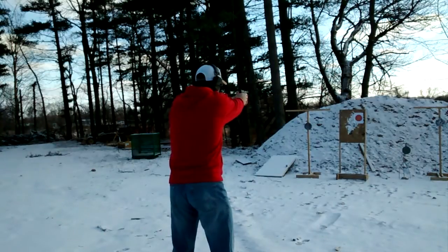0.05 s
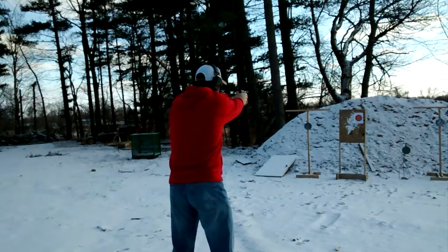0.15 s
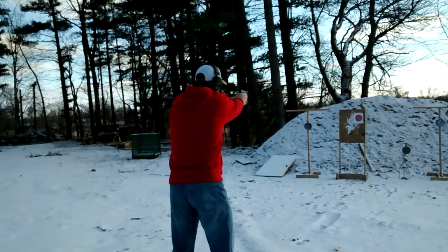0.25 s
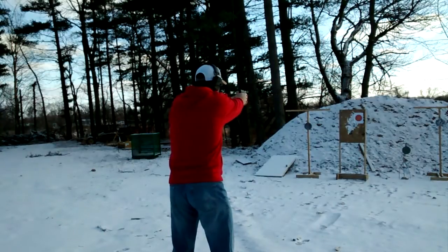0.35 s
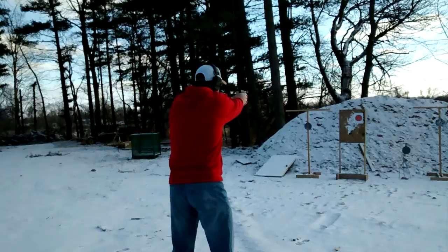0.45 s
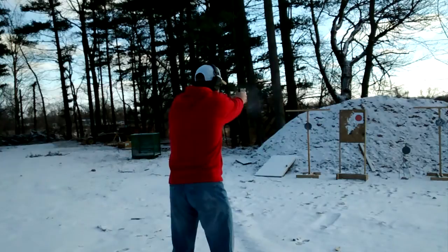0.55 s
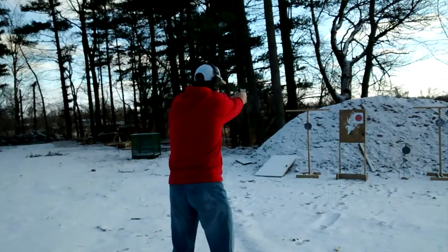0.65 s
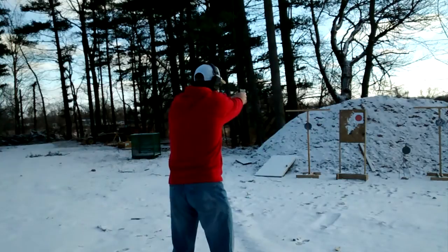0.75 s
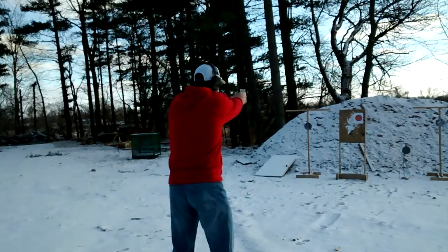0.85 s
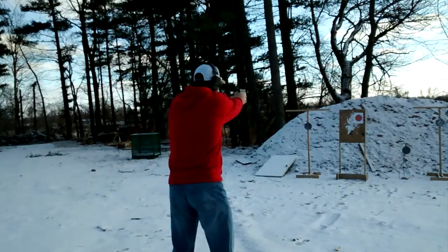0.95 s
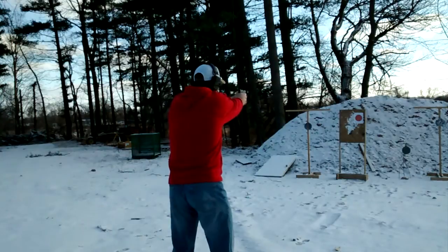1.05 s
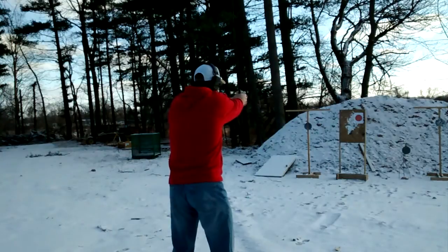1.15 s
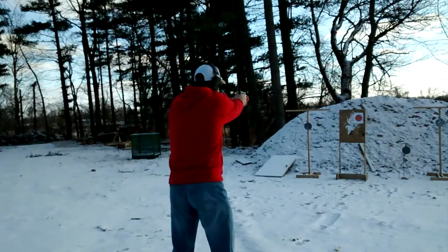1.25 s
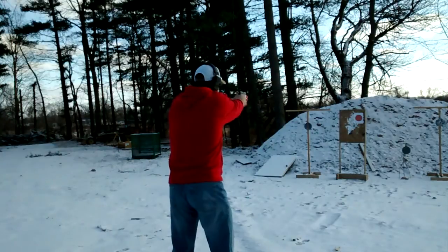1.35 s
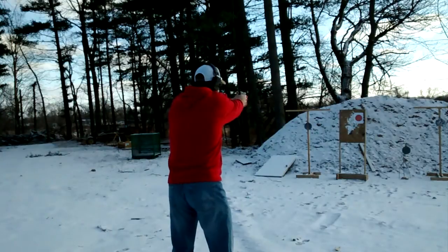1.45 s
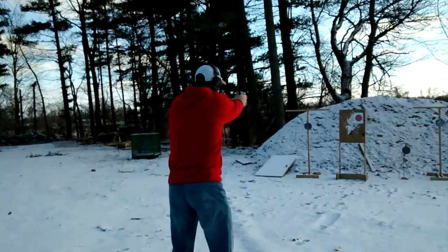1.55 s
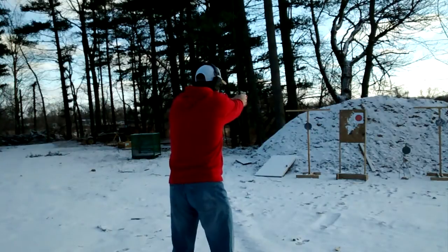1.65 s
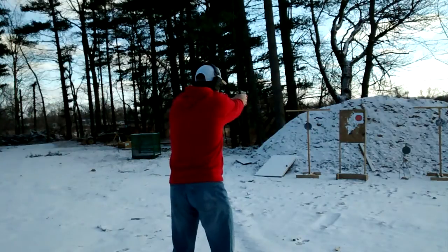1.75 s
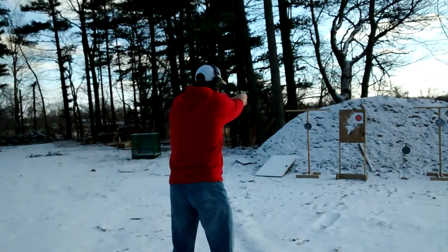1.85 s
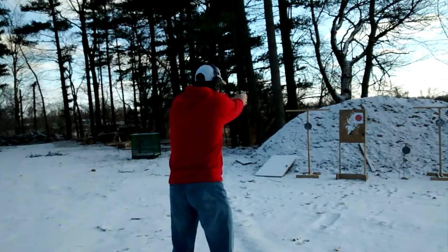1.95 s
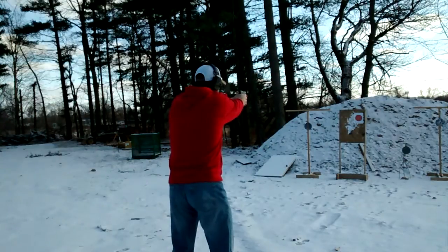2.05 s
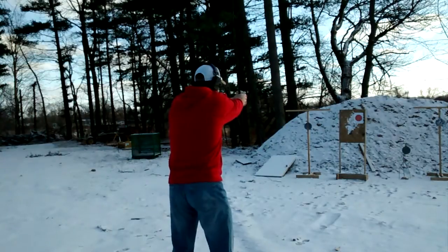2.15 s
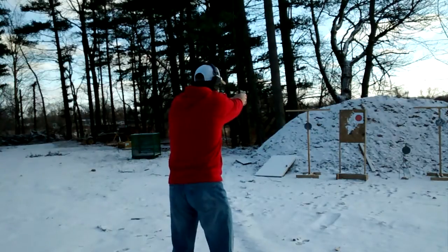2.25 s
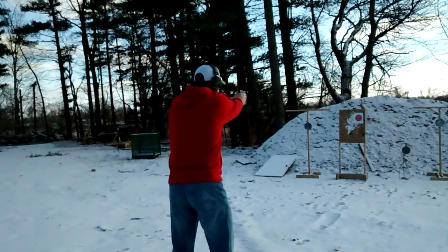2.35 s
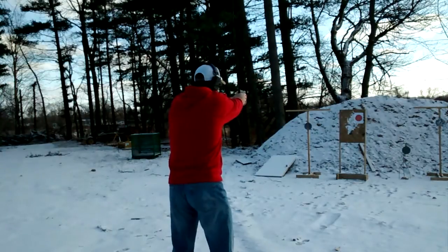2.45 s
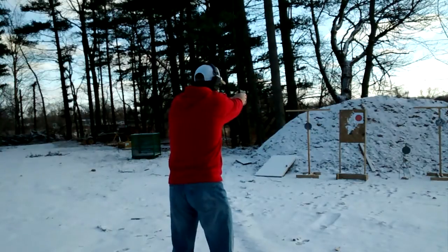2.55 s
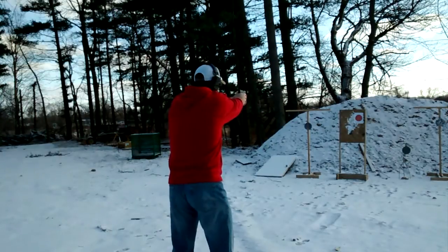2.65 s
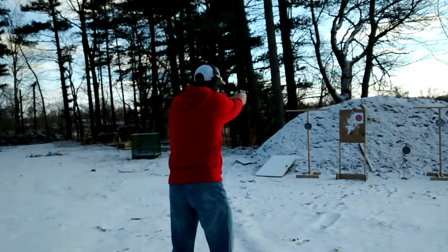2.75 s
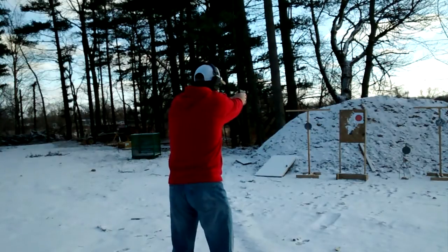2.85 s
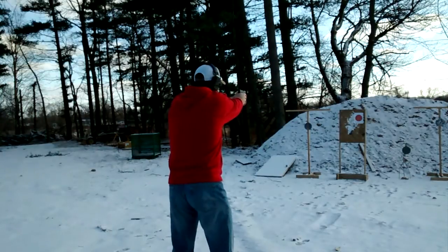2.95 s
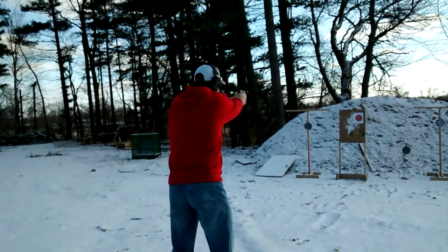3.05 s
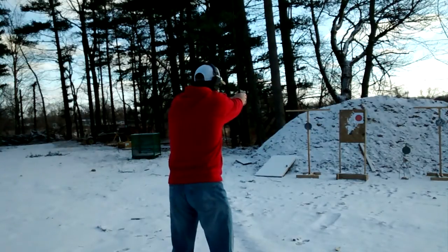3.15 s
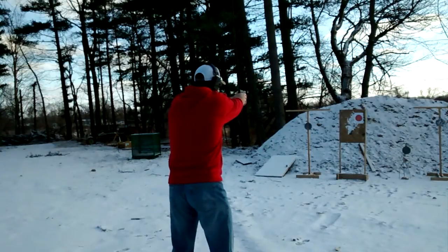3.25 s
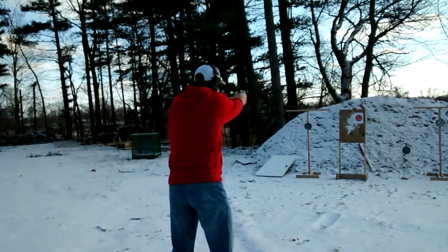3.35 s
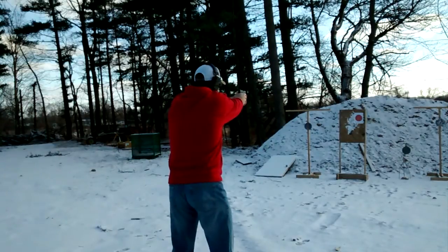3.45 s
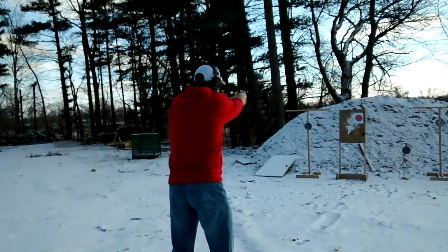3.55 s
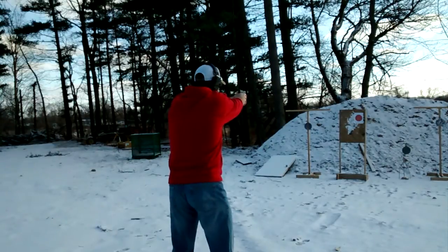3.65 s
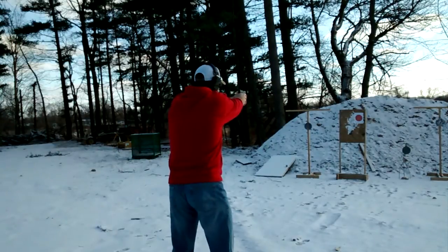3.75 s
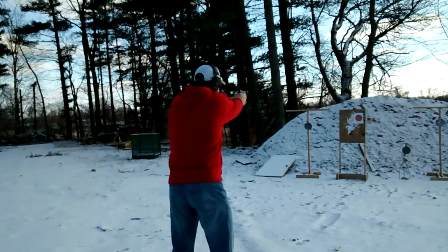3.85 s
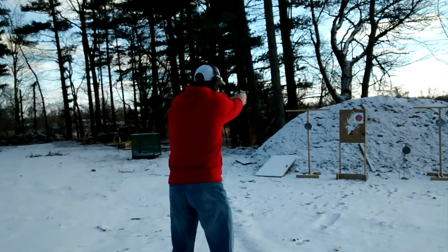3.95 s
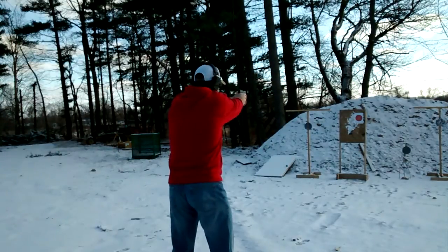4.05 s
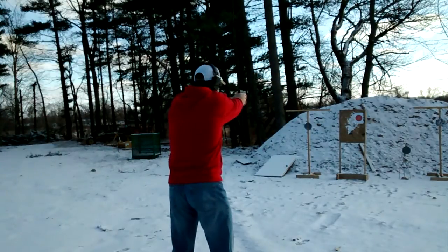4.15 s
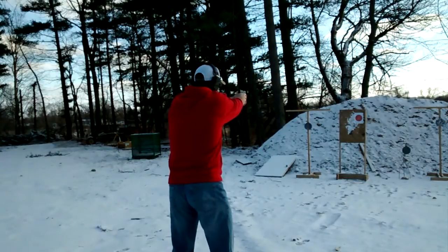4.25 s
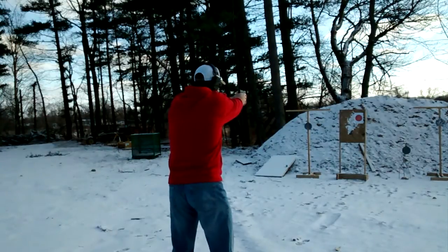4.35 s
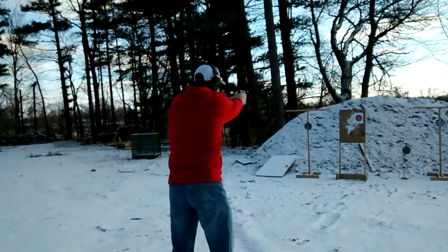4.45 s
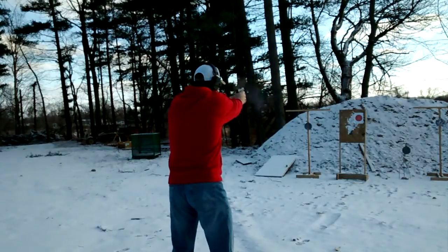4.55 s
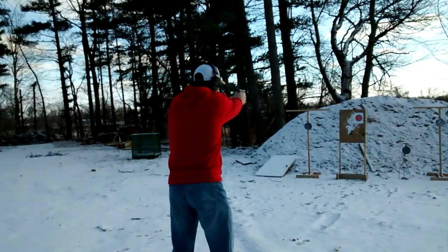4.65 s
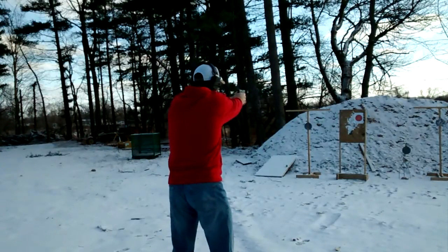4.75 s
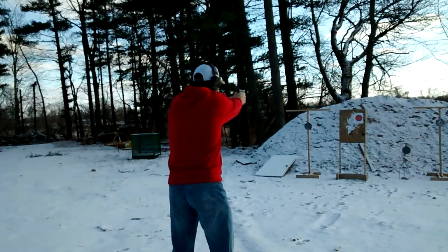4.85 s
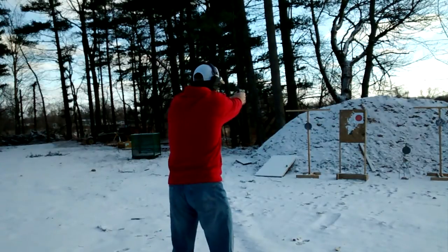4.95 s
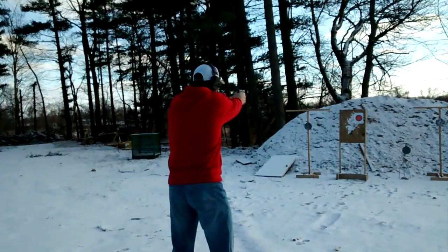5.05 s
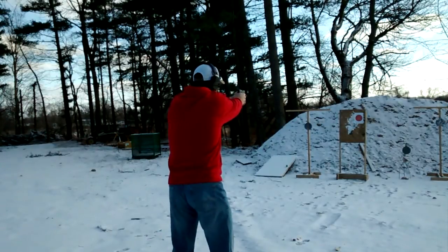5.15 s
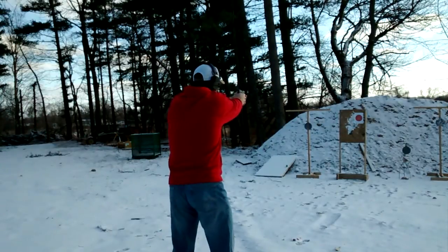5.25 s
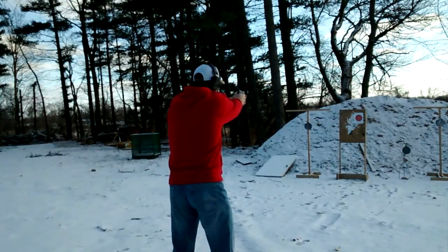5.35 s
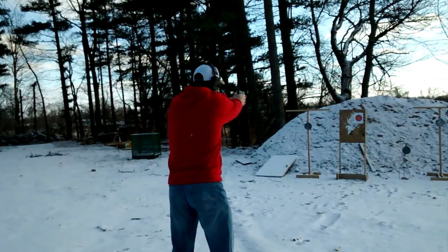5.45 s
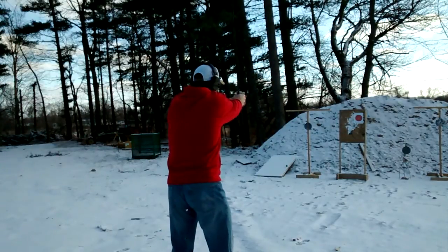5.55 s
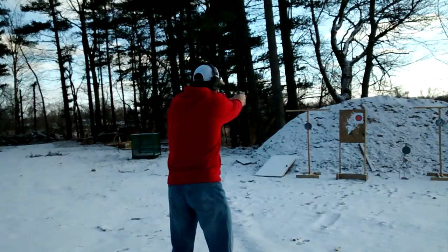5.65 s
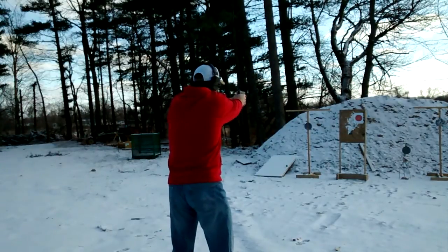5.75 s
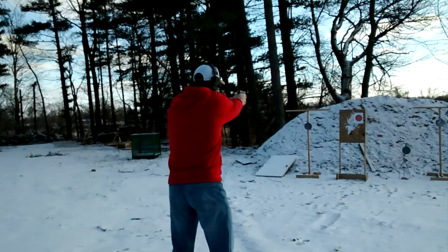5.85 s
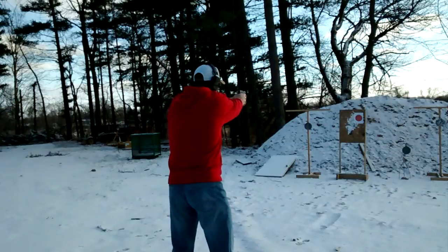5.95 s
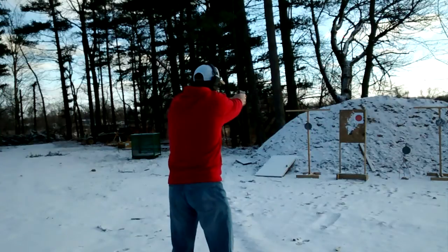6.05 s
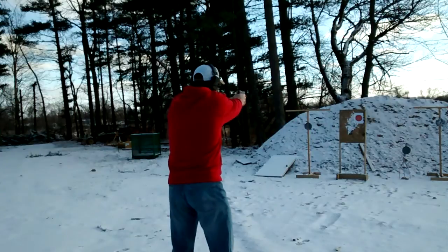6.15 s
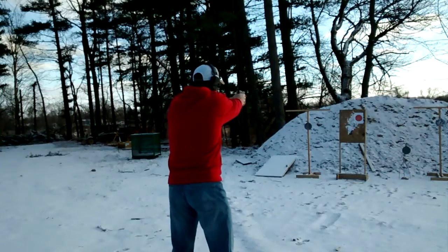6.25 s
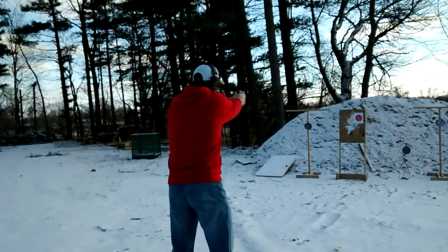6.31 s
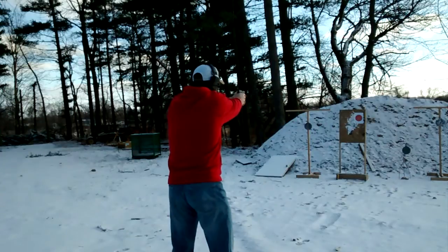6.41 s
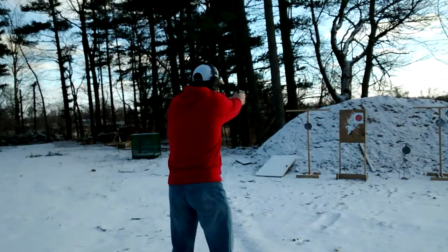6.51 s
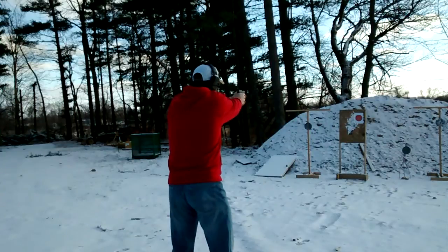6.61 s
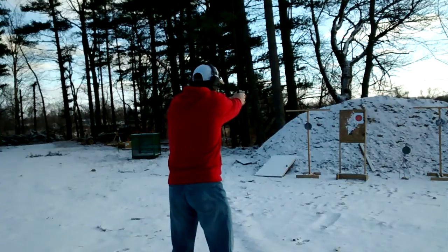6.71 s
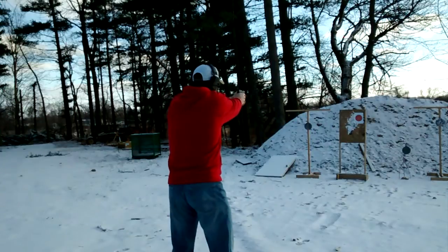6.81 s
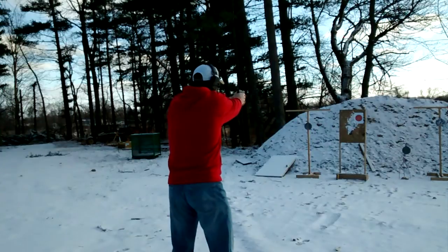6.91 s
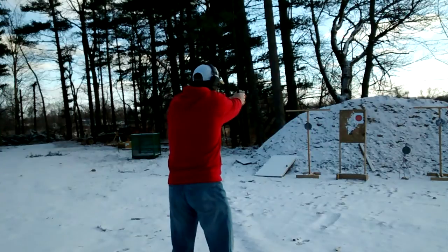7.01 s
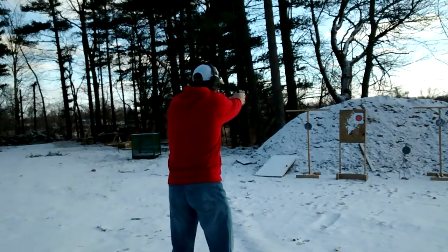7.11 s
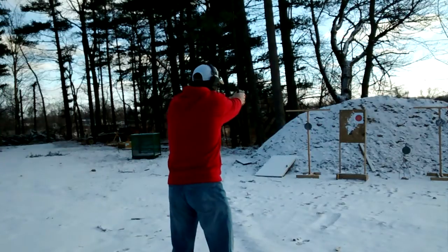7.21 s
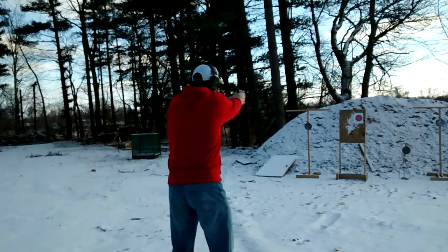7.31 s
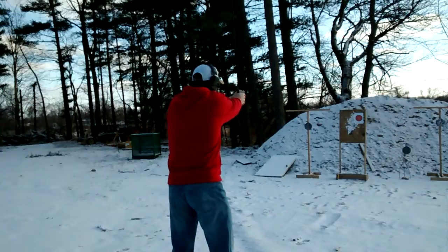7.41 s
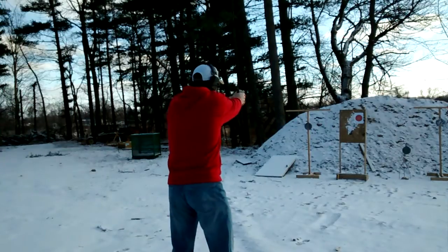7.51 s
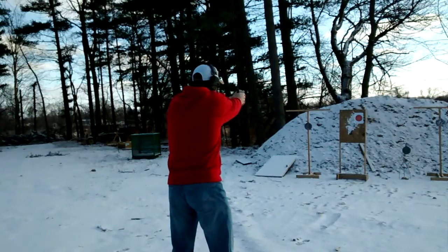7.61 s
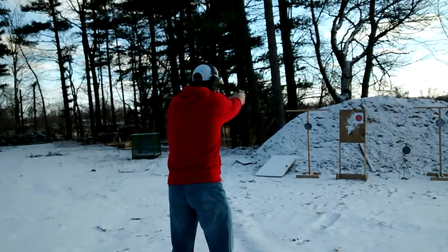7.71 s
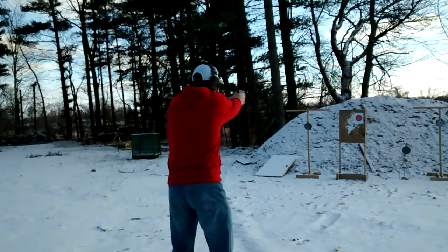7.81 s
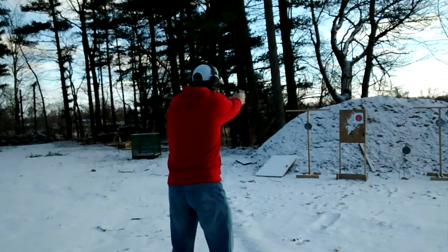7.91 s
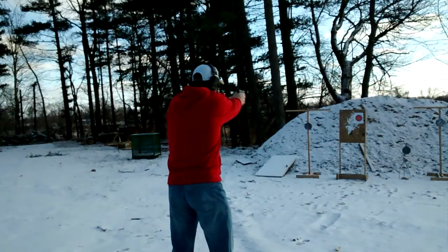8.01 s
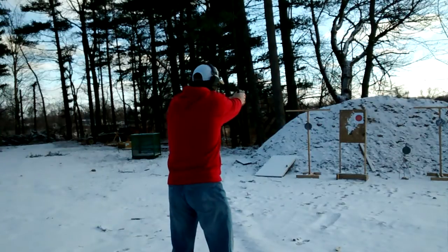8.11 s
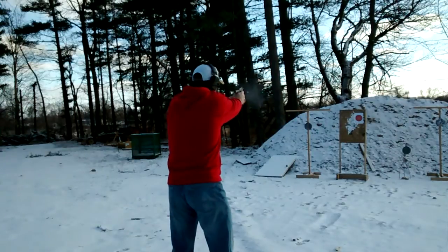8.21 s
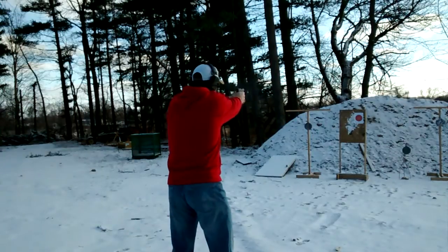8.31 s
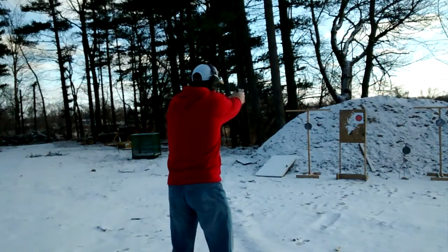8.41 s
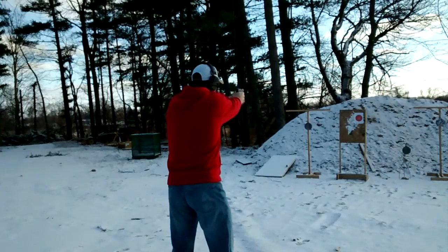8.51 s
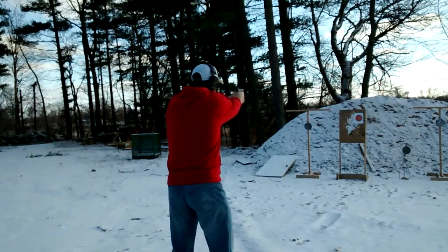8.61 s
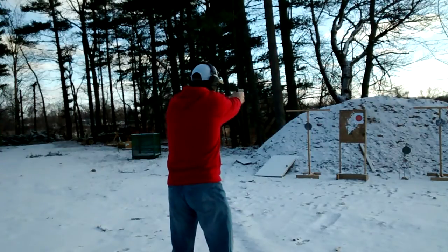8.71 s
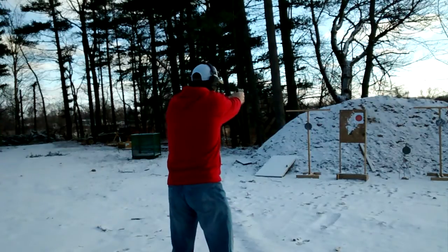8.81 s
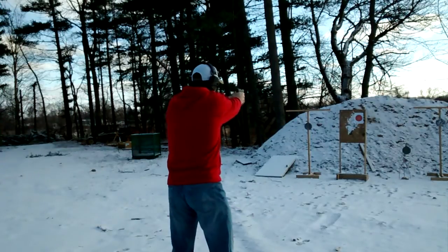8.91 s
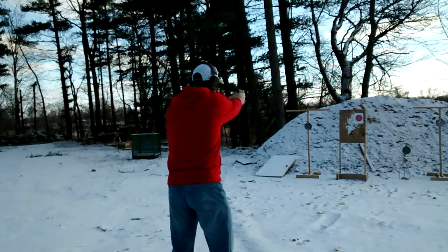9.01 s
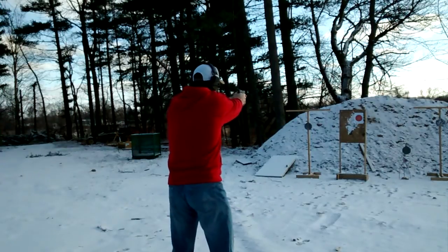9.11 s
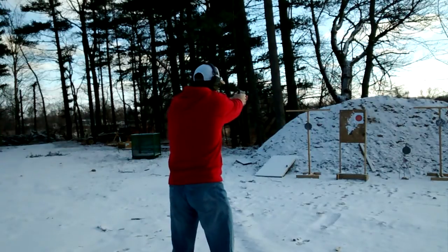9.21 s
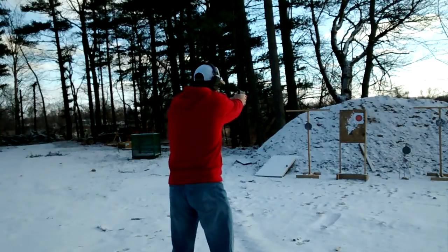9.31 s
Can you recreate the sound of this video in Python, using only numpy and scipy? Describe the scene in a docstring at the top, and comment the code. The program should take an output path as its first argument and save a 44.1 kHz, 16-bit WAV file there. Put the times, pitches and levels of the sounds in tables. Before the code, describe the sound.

An open, snowy shooting range beside woods, heard in stereo from a few steps behind the shooter. Wind flutters and thumps low on the microphones, then at 0.6 s a pistol cracks, sharp and clipped flat, with a brief steely slide clatter within 0.06 s. Dense midrange slaps from boards and berm run into a crackling roll among trees, mostly gone in a second, with a very faint distant tail. Background drops, then creeps back over roughly three seconds. A faint tick comes at 1.8 s; wind and pine rush swell around 2-3 s. A click at 4.25 s precedes a strong low gust and the second shot at 4.6 s. Gusts thump at 5.6 s and around 6.5-7 s, pines rushing near 6.3 s. Another click at 7.7 s, a buffet at 7.8 s, the third shot at 8.3 s, echoes fading into quiet hiss and a barely audible tick at 9.3 s.

```python
"""Three slow, aimed pistol shots crack out on a snowy range, a few steps from the microphones they overload.
Each is a shock pulse with decaying gas noise, then slide clatter; boards, berm and pines return filtered
pulses and decaying noise. Small clicks and dull ticks, decaying modes and noise, fall between the shots.
Wind noise and low thumps buffet the ports over a soft rush in the pines and a steady hiss.
A gain control ducks everything after each overload and creeps back."""
import sys
import numpy as np
from scipy import signal
from scipy.fft import rfft, irfft, next_fast_len
from scipy.io import wavfile
from scipy.ndimage import map_coordinates

SR = 44100
rng = np.random.default_rng(int(sys.argv[2]) if len(sys.argv) > 2 else 0)


def unload_wav(signal):
    """Save mono or channel-first audio to the path in sys.argv[1] as 16-bit WAV at rate SR, clipped to [-1, 1]."""
    wavfile.write(
        sys.argv[1],
        SR,
        np.round(np.clip(np.atleast_2d(signal).T, -1, 1) * 32767).astype(np.int16),
    )


N = 413216
TIME = np.arange(N) / SR


# All levels are ahead of the gain control; spectra are relative.
# shots: (time [s], blast level [dB], echo level [dB], overload surge level [dB])
SHOTS = [(0.5625, 21.5, -1, 9), (4.5861, 23, -0.9, 12), (8.2651, 21, -1.1, -10)]
# roll of the near wood: (frequency [Hz], density [dB per Hz])
NEAR_WOOD = [(40, -20), (150, -7), (400, 1.5), (900, -1.5), (1900, -4.5), (3100, -0.5), (4600, -12.5),
             (6300, -12), (7600, -22), (9000, -27.5), (15000, -34)]
# its decay: (frequency [Hz], t60 [s])
NEAR_T60 = [(100, 0.91), (800, 0.52), (3000, 0.51), (7000, 0.51), (14000, 0.54)]
# roll of the far wood: (frequency [Hz], density [dB per Hz])
FAR_WOOD = [(40, -32), (200, -18.5), (430, 0.5), (800, 0.5), (1250, -4), (1900, -12.5), (3200, -10),
            (4700, -20), (6500, -17.5), (12000, -39)]
# its decay: (frequency [Hz], t60 [s])
FAR_T60 = [(100, 0.84), (800, 1.49), (3000, 1.4), (6500, 0.95), (12000, .6)]
# roll of the hills: (frequency [Hz], density [dB per Hz])
HILLS = [(50, -21.5), (300, -14), (550, -0.5), (850, -0.5), (1400, -12.5), (2500, -18.5), (6000, -58.5)]


def pistol():
    """Every shot: blast, slide, the same echoes each time, and the roll of snow, wood and hills."""
    out = np.zeros((2, N))
    surfaces = echoes() + trees()
    snow_t60 = [(1000, 0.071), (4000, 0.032), (10000, 0.031)]  # (frequency [Hz], t60 [s])
    hills_t60 = [(500, 6.38)]
    for shot_s, blast_db, echo_db, surge_db in SHOTS:
        snow = scatter(GAS, snow_t60, db=3.0, rise_s=0.00047, spiky_db=2.5, size=SR // 10)
        near = scatter(NEAR_WOOD, NEAR_T60, db=-10.0, rise_s=0.027, spiky_db=3.0, size=SR * 2 // 3)
        far = scatter(FAR_WOOD, FAR_T60, db=-17, rise_s=0.077, spiky_db=1.5, size=2 * SR)
        hills = scatter(HILLS, hills_t60, db=-34.0, rise_s=0.73, spiky_db=2.0, size=3 * SR)
        add(out, shot_s, blast(blast_db, surge_db))
        add(out, shot_s, slide())
        for answer in (surfaces, snow, near, far, hills):
            add(out, shot_s, amp(echo_db) * answer)
    return out


# muzzle gas, also the colour of the snow's roll: (frequency [Hz], density [dB per Hz])
GAS = [(30, -19), (250, -4.5), (900, 7.5), (1700, -1.5), (2800, 0.5), (4500, -5), (6500, -5), (9500, -15.5),
       (15500, -22)]
# gas balance: (frequency [Hz], left-right [dB])
BLAST_PAN = [(200, -1), (1000, -3), (2400, 4), (4500, 5), (8000, 2.5), (15000, 4.5)]


def blast(db, surge_db, push_s=0.00032, ground_s=0.0034, ground_db=-3.5, gas_db=-2, gas_t60_s=0.0069,
          port_hz=2750, port_db=-5, port_t60_s=0.0063, lag_s=.00006):
    """Muzzle shock and turbulent gas ring the ports; the snow sends a second, duller copy."""
    t = TIME[:SR // 10]
    opposed = np.array([[1], [-1]])
    shock = (1 - t / push_s) * np.exp(-t / push_s)
    port = amp(port_db - 60 * t / port_t60_s) * np.sin(2 * np.pi * port_hz * t) * opposed
    turbulence = stereo(rng.standard_normal((2, len(t))), GAS, BLAST_PAN)
    gas = amp(gas_db - 60 * t / gas_t60_s) * turbulence
    direct = shock + port + gas
    both = direct.copy()
    bounce = filtered(direct, lambda hz: 1 / (1 + 1j * hz / 2600))
    add(both, ground_s, -amp(ground_db) * bounce)
    right_only = np.array([[0], [1]])
    both = filtered(both, lambda hz: np.exp(-2j * np.pi * hz * lag_s * right_only))
    # the overloaded channels swing apart for a few milliseconds
    surge = np.exp(-((t - .0028) / .001) ** 2) + 0.57 * np.exp(-((t - .0065) / 0.0019) ** 2)
    return amp(db) * both + amp(surge_db) * surge * opposed


# slide hits its rear stop, then runs home:
# (delay [s], level [dB], t60 [s], ring frequency [Hz], ring over rasp [dB])
SLIDE = [(0.0269, -10.5, .022, 3250, 14.5), (0.0285, -8, .024, 3000, 10), (0.0506, -17, .014, 2900, -3),
         (.0536, -12, .032, 3050, 16.5), (0.06, -10, 0.01, 5500, -12)]


def slide():
    """Steel on steel: short rasping bursts, each with one broad ring."""
    out, t = np.zeros((2, SR // 4)), TIME[:SR // 10]
    rasp_spectrum = [(200, -14.0), (1000, 4.5), (6200, -3.0), (9500, -21.5), (16000, -34)]
    for delay_s, db, t60_s, ring_hz, ring_db in SLIDE:
        hiss = rng.standard_normal((2, len(t)))
        ring = unit(filtered(hiss, lambda hz: 1 / (1 + 12j * (hz / ring_hz - 1))))
        rasp = noise(rasp_spectrum, len(t))
        add(out, delay_s, amp(db - 60 * t / t60_s) * unit(rasp + amp(ring_db) * ring))
    return out


# distinct echoes of boards, berm and forest edge; small surfaces answer higher;
# the two near 0.03 s give the slide's clack its body:
# (delay [s], peak level [dB], centre frequency [Hz], left-right [dB]); the shot's echo level adds
ECHOES = [(.0066, 5.5, 901, 7), (.0091, -1, 902, 4), (0.0267, -6.5, 860, -5.5), (0.0304, -6.5, 948, -7),
          (0.0402, 0, 653, -12.5), (.0497, 8.5, 797, 9), (.0509, 1, 762, -5.5), (0.077, -14.5, 650, 15),
          (0.089, -10, 886, 12), (0.0998, -6.5, 820, 0), (0.1178, -8, 540, 11), (0.1226, -5.5, 850, 5),
          (.147, -6, 1048, -1), (.197, -6, 1080, -1), (.277, -13, 910, -1), (.299, -11.5, 870, -2),
          (.307, -20.5, 1010, -5), (0.516, -30.5, 3000, -2)]
# rasp of a rough surface: (frequency [Hz], density [dB per Hz])
ROUGH = [(500, -18), (3200, 0.5), (6500, -7.5), (12000, -33)]


def echoes(spread_s=.00008, rough_db=-27, rough_t60_s=0.0089):
    """Each row is one pulse, not quite together at the ports, and a short rasp as of a rough surface."""
    out, t = np.zeros((2, SR)), TIME[:SR // 20]
    skews_s = spread_s * rng.standard_normal(len(ECHOES))
    for (delay_s, db, centre_hz, pan_db), skew_s in zip(ECHOES, skews_s):
        left, right = amp(db) * pan(pan_db) * slap(centre_hz)
        add(out[0], delay_s - skew_s / 2, left)
        add(out[1], delay_s + skew_s / 2, right)
        add(out, delay_s, amp(db + rough_db - 60 * t / rough_t60_s) * noise(ROUGH, len(t)))
    return out


# returned report at its reference centre: (frequency [Hz], level [dB])
REPORT = [(40, -38), (200, -16), (450, -2.5), (800, 4), (1100, -2), (1500, -15), (3000, -21), (6000, -32),
          (9000, -53.5), (16000, -70.5)]
REPORT_HZ = 800


def slap(centre_hz):
    """The report as a surface returns it: one pulse, strongest around centre_hz."""
    return pulse([(hz * centre_hz / REPORT_HZ, db) for hz, db in REPORT])


def trees():
    """Trunks scattered deep into the wood, and the denser row at its edge, where the roll swells again."""
    deep = trunks(count=130, first_s=.055, last_s=.8, db=-17, fall_db_per_s=38.5)
    edge = trunks(count=20, first_s=.275, last_s=.35, db=-23, fall_db_per_s=20)
    return deep + edge


def trunks(count, first_s, last_s, db, fall_db_per_s, scatter_db=5.5, centre_hz=900, octaves=.5, width_db=5):
    """Separate trees at random distances; their echoes crackle, tending weaker the farther they come."""
    out = np.zeros((2, SR))
    for k, (place, size, bearing, colour) in enumerate(rng.uniform(-1, 1, (count, 4))):
        later_s = (last_s - first_s) * (k + 1 + place) / count
        level_db = db - fall_db_per_s * later_s + scatter_db * size
        echo = slap(centre_hz * 2 ** (octaves * colour))
        add(out, first_s + later_s, amp(level_db) * pan(width_db * bearing) * echo)
    return out


# roll balance: (frequency [Hz], left-right [dB])
WOOD_PAN = [(60, -5), (110, 4), (200, 0.5), (380, -0.5), (700, -2), (1290, -1.0), (2380, -5), (4400, -2.5),
            (8120, 10.5), (15000, 1.5)]


def scatter(spectrum, t60, db, rise_s, spiky_db, size):
    """Countless scatterers blur the shot into a roll; each frequency dies at its own speed."""
    t, knots = TIME[:size], TIME[:size:44]
    sizes = np.interp(t, knots, rng.standard_normal(len(knots)))
    spiky = rng.standard_normal((2, size)) * amp(spiky_db * sizes)
    pair = stereo(spiky, spectrum, WOOD_PAN)
    hz, frame_s, bins = signal.stft(pair, SR, nperseg=256)
    decay = amp(-60 * frame_s / along(t60, hz)[:, None])
    tail = signal.istft(bins * decay, SR, nperseg=256)[1][:, :size]
    return amp(db) * tail * (1 - np.exp(-t / rise_s))


# side over mid: (frequency [Hz], ratio [dB])
WOOD_SIDE = [(60, 15.5), (200, -6), (400, -3.5), (700, -5), (1300, -8.5), (2400, 11.5), (3400, -3),
             (8000, 3)]


def stereo(pair, spectrum, balance):
    """Two unrelated signals become a coloured left and right of rms 1, narrow in the middle register."""
    def mid_side_gains(hz):
        angle = np.arctan(amp(along(WOOD_SIDE, hz)))
        return amp(along(spectrum, hz)) * [np.cos(angle), np.sin(angle)]
    mid, side = filtered(pair, mid_side_gains)
    left_right = np.array([mid + side, mid - side])
    return unit(filtered(left_right, lambda hz: pan(along(balance, hz))))


# small clicks and dull ticks, as of a trigger or a spent case landing; level_db adds:
# (time [s], relative level [dB], left-right [dB], tilt above 2500 Hz [dB per octave])
CLICKS = [(1.764, -34.5, 0.5, -5), (4.2534, -30.5, -1, -3), (7.6688, -30, -3.5, -1.5),
          (9.304, -42, -0.5, -5)]
# modes they share: (frequency [Hz], relative level [dB], t60 [s])
CLICK_MODES = [(1350, -10, .018), (1886, 4, 0.018), (2350, 7, 0.0082), (3160, -5, .012), (5400, 0, 0.013),
               (6300, -4, .014), (8600, -3, 0.014)]


def clicks(level_db=-8, rebound_s=0.0032, rebound_db=-3, air_db=-24):
    """Each click strikes and rebounds, ringing modes with a noise snap; the surroundings answer faintly."""
    out, t = np.zeros((2, N)), TIME[:SR // 5]
    snap_spectrum = [(400, -17), (2000, 7), (6000, -15), (15000, -5)]
    air_spectrum = [(600, -20), (2200, 10), (9000, -24)]
    for click_s, db, pan_db, tilt_db in CLICKS:
        for delay_s, hit_db in [(0, 0), (rebound_s, rebound_db)]:
            ring = np.zeros((2, len(t)))
            for hz, mode_db, t60_s in CLICK_MODES:
                cycles = hz * t + rng.random((2, 1))
                ring += amp(mode_db - 60 * t / t60_s) * np.sin(2 * np.pi * cycles)
            snap = amp(-60 * t / 0.015) * noise(snap_spectrum, len(t))
            air = amp(air_db - 60 * t / 0.3) * noise(air_spectrum, len(t))
            mix = 0.68 * ring + 0.74 * 1.94 * snap + air
            tick = filtered(mix, lambda hz: amp(tilt_db * np.log2(np.maximum(hz / 2500, 1))))
            add(out, click_s + delay_s, amp(db + level_db + hit_db) * pan(pan_db) * tick)
    return out


# port turbulence: (frequency [Hz], density [dB per Hz])
BUFFET = [(10, -22.5), (25, 4), (60, 3.5), (120, 3), (210, -2), (350, -12.5), (550, -24), (900, -41.5),
          (1500, -56), (4000, -78)]


def wind(level_db=0.12, lumps_db=1.5, flutter_db=2.5, sway_db=1.0, bright_db_per_db=0.32, bright_hz=300,
         spurt_db=2.5, pan_db=-1.7):
    """Turbulence at each port; stronger gusts reach higher, and single eddies thump."""
    strength_db = wind_strength()
    per_port_db = np.array([lumps_db * wobble(22) + flutter_db * wobble(90) for port in range(2)])
    lumps = amp(sway_db * wobble(9) + per_port_db)
    flow = unit(noise(BUFFET, N) * lumps)
    upper = filtered(flow, lambda hz: hz ** 2 / (hz ** 2 + bright_hz ** 2))
    upper_db = bright_db_per_db * (strength_db - np.median(strength_db)) + spurt_db * wobble(35)
    buffet = widened(flow + upper * (amp(upper_db) - 1), cross=0.67)
    return (amp(strength_db + level_db) * buffet + eddies(strength_db)) * pan(pan_db)


# breeze at the ports, swelling and dropping every few seconds: (time [s], strength [dB])
BREEZE = [(0, -22), (.52, -28), (.7, -41.5), (1.12, -41), (1.8, -31.5), (2.42, -24), (2.95, -23),
          (3.35, -30.5), (3.8, -27.5), (4.25, -37.5), (5.1, -43), (5.5, -34.5), (6.5, -22.5), (6.95, -22),
          (7.25, -29.5), (8.2, -27), (8.42, -45), (9.37, -53.5)]
# short gusts on top: (crest time [s], 1/e half length [s], rise [dB])
GUSTS = [(0.026, .05, 4.5), (0.364, 0.043, 5), (2.029, 0.091, 4.5), (2.434, 0.045, 5), (4.385, .055, 12.5),
         (4.502, .07, 18.5), (5.59, 0.1, 10.5), (6.879, .15, 1), (7.826, .11, 4.5)]


def wind_strength():
    """Buffeting in dB: the slow breeze, with each gust a bell-shaped rise on top."""
    gusts_db = sum(rise_db * np.exp(-((TIME - crest_s) / half_s) ** 2) for crest_s, half_s, rise_db in GUSTS)
    return np.interp(TIME, *np.transpose(BREEZE)) + gusts_db


# strongest eddies at a port, before panning: (time [s], level [dB])
EDDIES = [(0.068, -25), (0.371, -18.5), (1.956, -24), (2.434, -21), (4.508, -16), (5.615, -19.5),
          (6.654, -24), (6.817, -23), (7.051, -20), (7.78, -22.5), (7.916, -26.5)]
# one eddy: (frequency [Hz], density [dB per Hz])
THUMP = [(15, -27), (60, 5.5), (170, -5), (350, 0.5), (550, -10), (900, -30), (1600, -44), (4000, -71.5)]


def eddies(strength_db, lean_db=5, count=50, small_db=-5, small_scatter_db=3.5):
    """Low thumps that lean to one port; the lesser ones come at random and grow with the wind."""
    out, thump = np.zeros((2, N)), pulse(THUMP)
    lesser = []
    for i in rng.integers(N, size=count):
        lesser.append((TIME[i], strength_db[i] + small_db + small_scatter_db * rng.standard_normal()))
    for eddy_s, db in lesser + list(EDDIES):
        add(out, eddy_s, amp(db) * pan(lean_db * rng.standard_normal()) * thump)
    return out


# rush in the pines, before a small random wobble: (time [s], level [dB])
PINES = [(0, -57.5), (1.5, -53), (2.1, -46), (2.8, -51.5), (4.1, -55.5), (5.4, -54), (6.1, -44.5),
         (6.5, -45), (7.2, -53.5), (8.0, -55.5), (9.3, -55)]
# microphone hiss: (frequency [Hz], density [dB per Hz])
HISS = [(100, -8.5), (1000, -2), (2000, 1.5), (3500, 1), (5000, 0), (9000, -2), (15500, -3)]


def background(hiss_db=-57.5):
    """A soft rush swells in the distant pines, over the hiss of the microphones."""
    rush_spectrum = [(60, -14.5), (300, -5), (600, 3.5), (900, -2.5), (1400, -18.0), (2500, -35.0), (6000, -58.5)]
    mid, side = noise(rush_spectrum, N)
    rush_db = np.interp(TIME, *np.transpose(PINES)) + 1.1 * wobble(7)
    pines = amp(rush_db) * unit(np.array([mid + .5 * side, mid - .5 * side]))
    hiss = amp(hiss_db) * widened(noise(HISS, N), cross=0.66, fade_hz=4100)
    return pines + hiss


def widened(ports, cross=.66, lag_s=.000385, fade_hz=6000):
    """Each channel subtracts a late, duller copy of the other: unrelated sound turns wide and comb-coloured."""
    late = filtered(ports[::-1], lambda hz: np.exp(-2j * np.pi * hz * lag_s) / np.hypot(1, hz / fade_hz))
    return unit(ports - cross * late)


def noise(spectrum, n):
    """Two unrelated coloured noises of joint rms 1."""
    return unit(filtered(rng.standard_normal((2, n)), lambda hz: amp(along(spectrum, hz))))


def pulse(spectrum, size=2048):
    """A causal minimum-phase pulse of peak 1 with the given spectrum."""
    hz = np.fft.rfftfreq(size, 1 / SR)
    cepstrum = irfft(np.log(amp(along(spectrum, hz))))
    wave = irfft(np.exp(rfft(2 * cepstrum[:size // 2], size)))
    return wave / np.abs(wave).max()


def wobble(rate_hz):
    """A smooth random curve through rate_hz random knots a second."""
    coarse = TIME[::32]
    knots = rng.standard_normal(int(N * rate_hz / SR) + 4)
    return np.interp(TIME, coarse, map_coordinates(knots, [coarse * rate_hz]))


def filtered(x, response):
    """x times a response of frequency, zero-padded against wrap-around."""
    n = x.shape[-1]
    m = next_fast_len(n + SR // 4)
    return irfft(rfft(x, m) * response(np.fft.rfftfreq(m, 1 / SR)), m)[..., :n]


def along(points, hz):
    """(frequency [Hz], value) points read on a log axis."""
    f, v = np.transpose(points)
    return np.interp(np.log(hz + 1), np.log(f + 1), v)


def amp(db):
    """Decibels to gain."""
    return 10 ** (np.asarray(db) / 20)


def unit(x):
    """Scaled to rms 1."""
    return x / np.sqrt(np.mean(x ** 2) + 1e-20)


def pan(db):
    """Left and right gains for a level difference."""
    return amp(np.array([[.5], [-.5]]) * db)


def add(track, start_s, sound):
    """Mix a sound into a track from start_s."""
    start = max(round(start_s * SR), 0)
    part = sound[..., :track.shape[-1] - start]
    track[..., start:start + part.shape[-1]] += part


def scene():
    """Everything that reaches the two microphones."""
    return pistol() + clicks() + wind() + background()


def record(dry, duck_db=8, hold_s=1.74, release_s=1.22, rail=0.89, top_hz=15800):
    """An overload turns the gain down, to creep back after a hold; peaks clip flat, the extreme top is cut."""
    overload = np.abs(dry).max(axis=0) > 2
    since_s = TIME - np.maximum.accumulate(np.where(overload, TIME, -20))
    depth = np.clip(1 - (since_s - hold_s) / release_s, 0, 1)
    ducked = dry * amp(-duck_db * depth)
    return filtered(np.clip(ducked, -rail, rail), lambda hz: 1 / (1 + (hz / top_hz) ** 120))


dry = scene()
out = record(dry)
unload_wav(out)
```